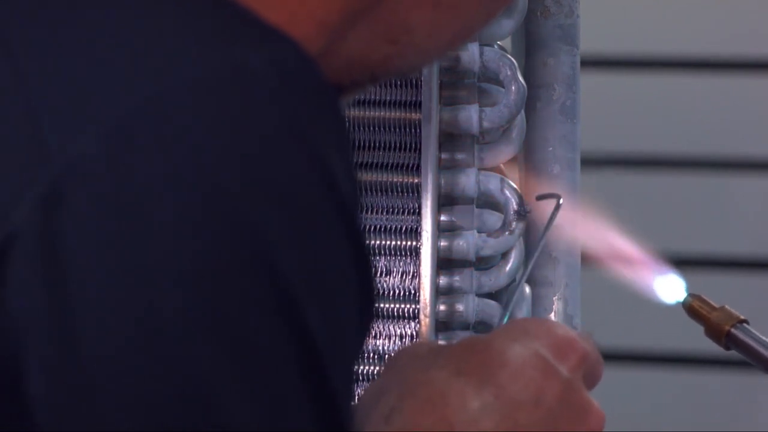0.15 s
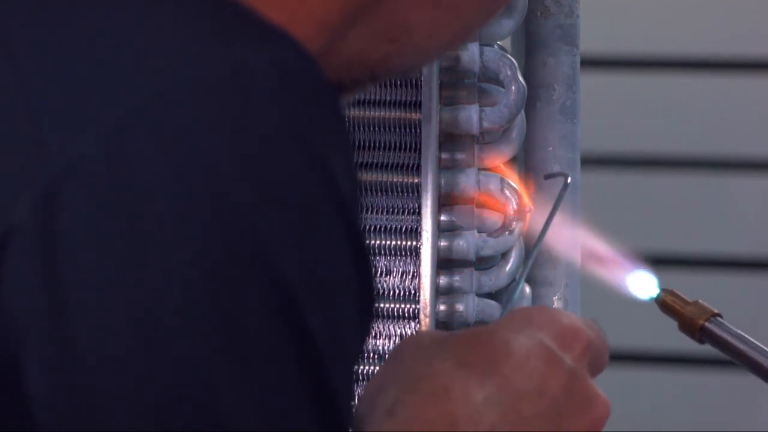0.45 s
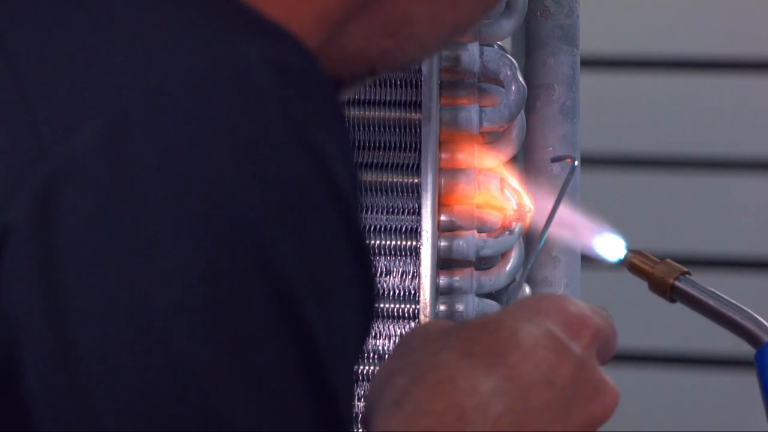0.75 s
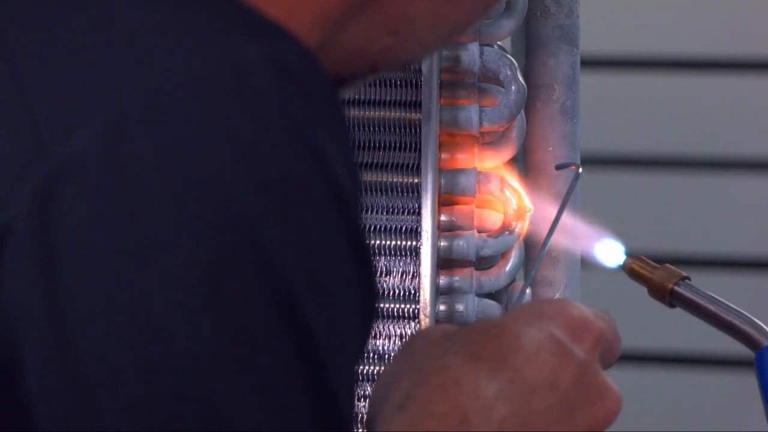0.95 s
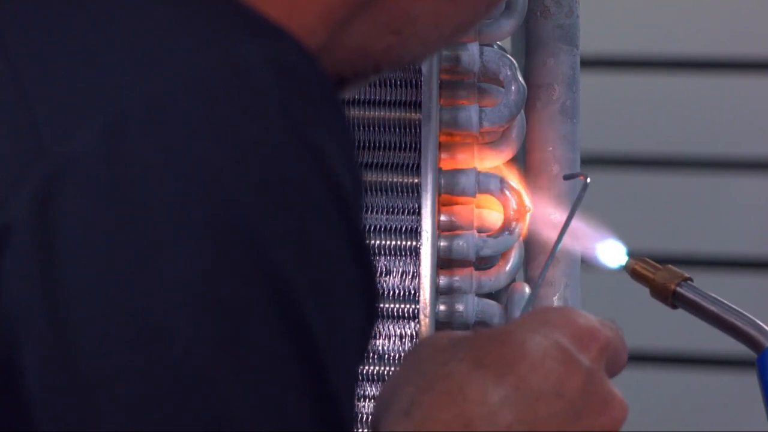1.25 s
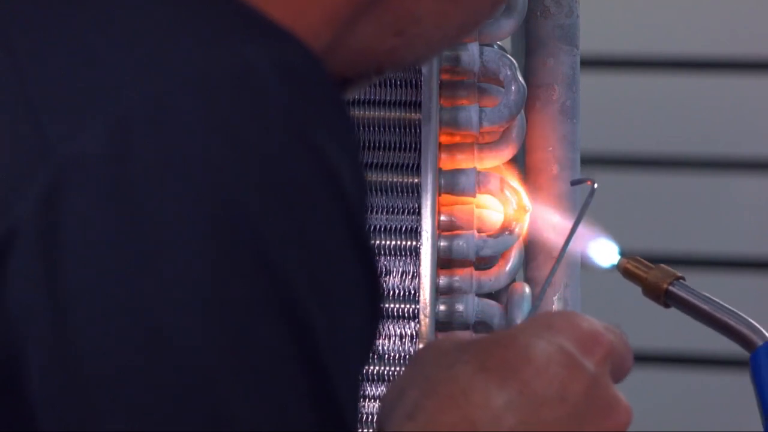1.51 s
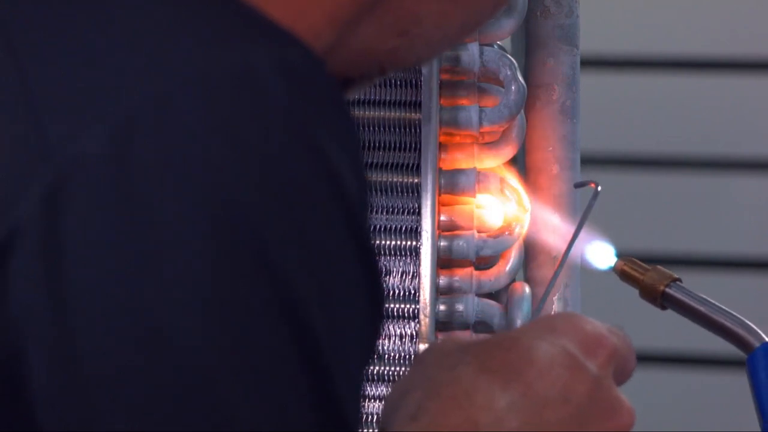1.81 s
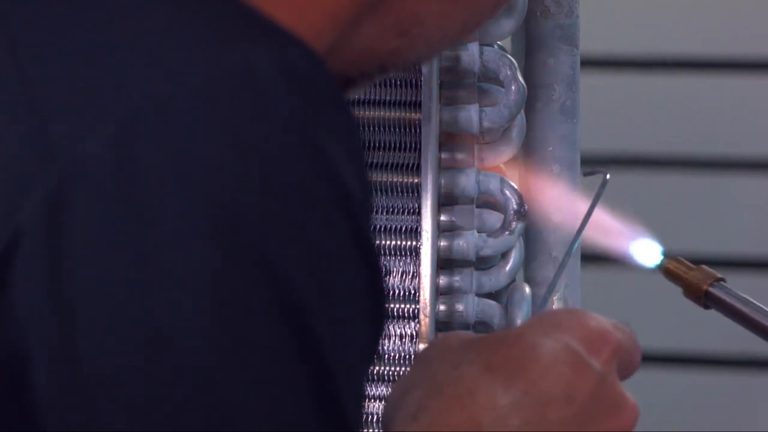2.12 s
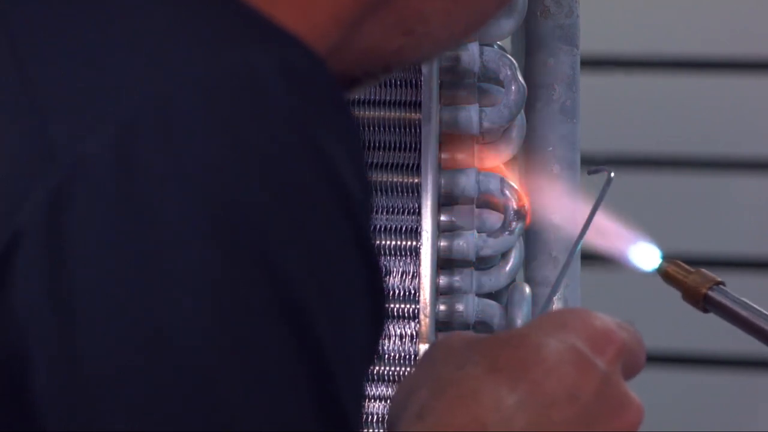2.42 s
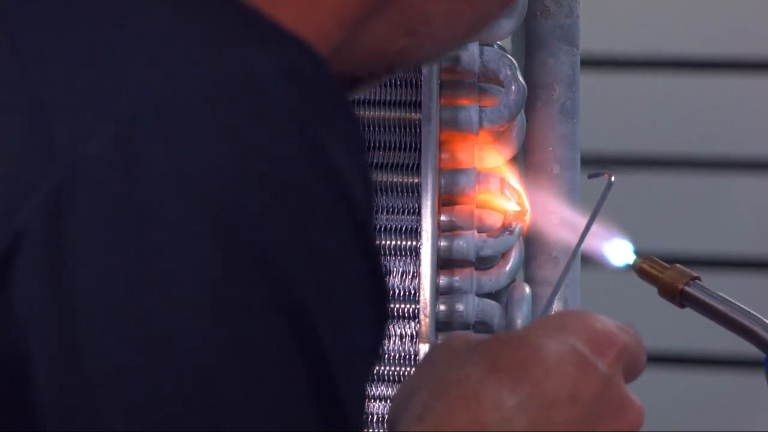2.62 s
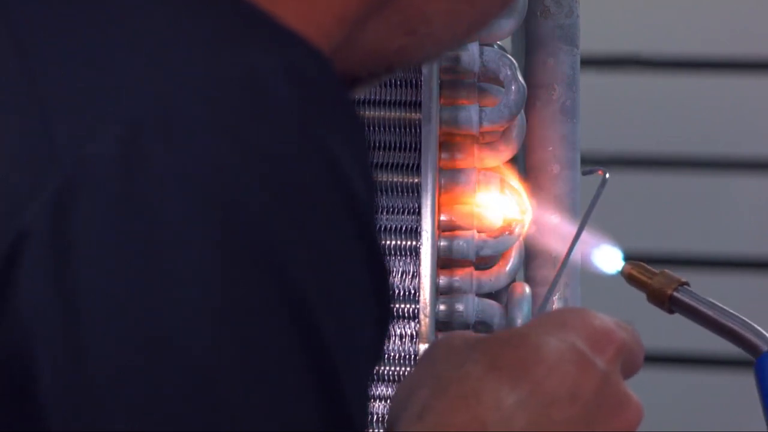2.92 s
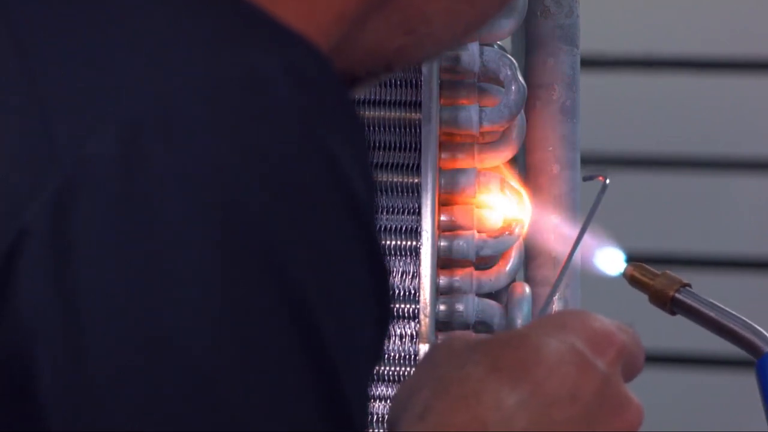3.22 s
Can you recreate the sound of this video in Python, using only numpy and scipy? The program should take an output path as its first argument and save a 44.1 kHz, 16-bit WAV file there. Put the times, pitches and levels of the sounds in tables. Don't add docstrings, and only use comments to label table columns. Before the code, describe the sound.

Gas torch burning close by: a piercing thin whistle over steady hiss and soft flame roar.

```python
import sys
import numpy as np
from scipy import signal
from scipy.fft import rfft, irfft, next_fast_len
from scipy.io import wavfile
from scipy.ndimage import uniform_filter1d, map_coordinates

SR = 44100
rng = np.random.default_rng(int(sys.argv[2]) if len(sys.argv) > 2 else 0)


def ratio_of_db(decibels):
    return 10 ** (np.asarray(decibels, float) / 20)


def persist_wave(psi):
    counts = np.round(np.clip(psi, -1, 1) * 32767).astype(np.int16)
    wavfile.write(sys.argv[1], SR, np.atleast_2d(counts).T)


N = 147735
WIDE = next_fast_len(N)


def level(x, db):
    return x * ratio_of_db(db) / np.sqrt(np.mean(x ** 2))


def read(table, col):
    rows = np.array(table, float)
    return np.interp(np.arange(N) / SR, rows[:, 0], rows[:, col])


def walk(rate):
    hold = int(SR / rate)
    steps = np.repeat(rng.standard_normal(N // 20), hold)[:N + hold]
    return 1.3 * uniform_filter1d(uniform_filter1d(steps, hold), hold)[:N]


def bandpass(x, low_hz, high_hz):
    return signal.sosfilt(signal.butter(2, [low_hz, high_hz], "band", fs=SR, output="sos"), x)


def bumps(x, table):
    hz = np.fft.rfftfreq(WIDE, 1 / SR)
    db = sum(change / (1 + (2 * (hz - f) / width) ** 2) for f, width, change in table)
    return irfft(rfft(x, WIDE) * ratio_of_db(db), WIDE)[:N]


# [t/s, length/s, depth/dB (negative for a surge)]
FALTERS = [(0.082, 0.043, -3.0), (0.219, 0.037, -1.8), (0.272, 0.014, -3.7), (0.318, 0.016, -4.2),
           (0.377, 0.012, 12.2), (0.474, 0.023, -3.1), (0.655, 0.013, 6.3), (0.686, 0.025, 4.7),
           (0.796, 0.011, 5.8), (0.813, 0.012, -3.8), (0.855, 0.009, 4.9), (0.885, 0.016, 6.5),
           (0.925, 0.012, -4.8), (0.958, 0.012, -2.8), (1.016, 0.015, -3.6), (1.051, 0.05, 6.6),
           (1.089, 0.009, -4.4), (1.107, 0.008, 6.1), (1.137, 0.019, 7.1), (1.325, 0.033, -2.7),
           (1.371, 0.06, 3.5), (1.429, 0.019, -4.1), (1.469, 0.02, 6.6), (1.525, 0.045, 2.5),
           (1.56, 0.015, -4.4), (1.585, 0.017, 3.5), (1.642, 0.008, -4.9), (1.703, 0.011, -4.1),
           (1.747, 0.044, 4.3), (1.8, 0.014, 3.7), (1.878, 0.06, -1.7), (1.943, 0.014, -2.9),
           (1.976, 0.014, -2.7), (2.014, 0.032, -1.7), (2.161, 0.012, 3.2), (2.223, 0.009, 5.8),
           (2.236, 0.017, -4.6), (2.266, 0.036, 7), (2.312, 0.036, 4), (2.35, 0.026, -3),
           (2.387, 0.036, 17), (2.457, 0.01, 3), (2.492, 0.04, -2.0), (2.592, 0.019, -2.9),
           (2.62, 0.011, 11), (2.634, 0.014, -3.9), (2.671, 0.008, -4.1), (2.725, 0.043, -2.7),
           (2.761, 0.047, 2.9), (2.841, 0.019, 14), (2.915, 0.03, -3.5), (2.941, 0.011, 12),
           (2.965, 0.03, 4.5), (3.001, 0.06, -2.5), (3.052, 0.008, -4.2), (3.107, 0.047, -1.5),
           (3.16, 0.021, -2.0), (3.237, 0.018, -3.0), (3.299, 0.009, -3.4), (3.334, 0.022, 15.2)]
FLUTTER_DB, FLUTTER_RATE = .4, 70
DEEPEN, SURGE, BREAK_DB = 1.1, .8, 8


def strength():
    t = np.arange(N) / SR
    firm_db = FLUTTER_DB * walk(FLUTTER_RATE)
    for at, length, db in FALTERS:
        depth = db * (DEEPEN if db > 0 else SURGE)
        sharpness = 4 if db > BREAK_DB else 2
        firm_db = firm_db - depth * np.exp(-(2 * (t - at) / length) ** sharpness)
    return firm_db


def spin(hz):
    return np.exp(2j * np.pi * np.cumsum(hz) / SR)


# [t/s, f/Hz, level/dB]
WHISTLE = [(0, 5014, -17.5), (.34, 5016, -16), (.375, 4996, -16), (.40, 5027, -16), (.62, 5016, -15.2),
           (.74, 5005, -14.8), (.81, 5032, -15), (1.0, 5034, -15.2), (1.25, 5045, -16), (1.37, 5030, -16),
           (1.52, 5046, -16.5), (1.76, 5042, -17), (1.88, 5031, -14.8), (2.23, 5030, -14.5),
           (2.46, 5019, -16), (2.6, 5031, -15.5), (2.85, 5032, -16), (3.35, 5031, -14.6)]
WAVER_HZ, WAVER_RATE = 6, 60
BREATH_DB, BREATH_WIDTH_HZ = -32.5, 80
SAG_HZ_PER_DB = 1.6


def whistle(strength_db):
    hz = read(WHISTLE, col=1) + SAG_HZ_PER_DB * np.clip(strength_db, -16, 0)
    memory = np.exp(-np.pi * BREATH_WIDTH_HZ / SR)
    soft = signal.lfilter([1], [1, -memory], rng.standard_normal((2, N)))
    breath = ((soft[0] + 1j * soft[1]) * spin(hz + 45)).real
    breath = level(breath, BREATH_DB) * ratio_of_db(strength_db / 2)
    tone = np.sqrt(2) * spin(hz + WAVER_HZ * walk(WAVER_RATE)).real
    return ratio_of_db(read(WHISTLE, col=2) + strength_db - 1.75) * tone + breath


# [t/s, gas flow level/dB, torch moved from its mean place/cm,
# flame bite on the metal level/dB, tip turned to the microphone level/dB]
HAND = [(0, 2, 3.1, 0.3, -1.5), (.3, 0, 2.3, 0.1, 1), (.55, 1.3, 2.5, 1.3, 0.5), (.75, 0.5, 1.5, 0.2, 0.8),
        (1.05, 0, 1.3, -0.3, 2), (1.35, 1.1, 0.9, 1.7, 3.5), (1.6, 1.5, 0.1, -0.2, 0),
        (1.76, 0.5, 1.1, -2.5, -.5), (1.9, -2, 0.73, -2, 3.5), (2.15, -0.7, 1.7, -1.2, 3.5),
        (2.32, 0.1, 0.95, -2, 3.5), (2.4, 1, 2.1, -0.4, -1), (2.55, 1.5, 2.3, 0.7, 1.5),
        (2.7, 1, 1.1, 0.3, 0.5), (2.9, 0.1, 0.94, -0.2, 1), (3.1, -0.6, 0.98, -1.2, 1),
        (3.25, 0.3, 1, -1.2, 1.5), (3.35, -2.3, 0.5, -2.7, 2.5)]
# [f/Hz, change/dB per dB]
COUPLING = [(300, 0.28), (1500, 0.11), (2500, 0.17), (3000, -0.44), (3500, -0.98), (4200, 0.7), (6000, 0.4),
            (8000, 0.15), (11000, 0.5)]
# [f/Hz, width/Hz, level/dB]
TIP = [(531, 28, 2.5), (945, 28, 5), (1344, 327, -15), (2370, 77, -1.5), (2600, 31, 3), (3520, 190, 9),
       (3827, 114, 11.5), (6274, 280, 7), (6494, 78, 8), (7230, 40, 8), (8040, 150, 9.5), (8930, 210, 7),
       (9700, 490, 3.5), (10300, 180, -6)]
TURN_HZ = 7750


def turbulence(points, strength_db, fall_db, swell_db, flicker_db):
    octave = np.log2(np.maximum(np.fft.rfftfreq(WIDE, 1 / SR), 1))
    points, coupling = np.array(points, float), np.array(COUPLING, float)
    edge = np.log2(points[:, 0])
    outside = np.maximum(edge[0] - octave, 0) + np.maximum(octave - edge[-1], 0)
    db = np.interp(octave, edge, points[:, 1]) - fall_db * outside
    colour = rfft(rng.standard_normal(WIDE)) * ratio_of_db(db)
    swell, turned_db = walk(14), read(HAND, col=4)
    out = 0
    for mid in np.arange(7.5, 14.1, 1 / 3):
        share = np.cos(np.clip(3 * (octave - mid), -1, 1) * np.pi / 2) ** 2
        lean_db = np.interp(mid, np.log2(coupling[:, 0]), coupling[:, 1]) * strength_db
        beam_db = turned_db / (1 + (TURN_HZ / 2 ** mid) ** 4)
        moving_db = swell_db * swell + flicker_db * walk(5.66) + lean_db + beam_db
        out = out + irfft(colour * share, WIDE)[:N] * ratio_of_db(moving_db)
    return level(bumps(out, TIP), 0)


# [f/Hz, level/dB per Hz]
JET = [(1710, -78), (2900, -35.5), (4790, -2), (4880, -4.5), (5170, -5), (5570, -8), (7620, -16.5),
       (9860, -19.5), (13000, -37.5)]
JET_DB = -19.5


def jet(strength_db):
    return ratio_of_db(JET_DB + read(HAND, col=1)) * turbulence(JET, strength_db, 30, 0.35, 1.0)


# [f/Hz, level/dB per Hz]
ROAR = [(190, -19), (330, -8.5), (531, -3), (957, -6), (1020, -3.5), (1350, 17.5), (1500, -1), (2650, -4.5),
        (3200, -5.5), (4160, -54), (7040, -120)]
ROAR_DB = -29.5


def roar(strength_db):
    return ratio_of_db(ROAR_DB + read(HAND, col=3)) * turbulence(ROAR, strength_db, 40, 0.17, 0.19)


# [f/Hz, width/Hz, level/dB]
HOLLOW = [(12500, 1500, -15), (14800, 1500, -3)]
AIR_DB = -34.5


def fizz(strength_db):
    treble = signal.butter(2, 10000, "high", fs=SR, output="sos")
    air = signal.sosfilt(treble, rng.standard_normal(N))
    moving_db = read(HAND, col=4) + .1 * strength_db + 0.76 * walk(6)
    return level(bumps(air, HOLLOW), AIR_DB) * ratio_of_db(moving_db)


# [t/s, peak level/dB]
POPS = [(0.087, -36), (0.264, -32), (.295, -30), (0.326, -42), (0.389, -31), (.417, -33), (.668, -34),
        (0.721, -32), (1.176, -32), (1.45, -38), (1.485, -31), (1.609, -31), (1.642, -39), (1.705, -35),
        (2.30, -31), (2.413, -30), (2.485, -41), (2.61, -49), (3.343, -32)]
POP_MS, RUMBLE_DB = 1.4, -49


def puffs(strength_db):
    t = np.arange(N) / SR
    slow = signal.butter(2, 500, fs=SR, output="sos")
    burn = signal.sosfilt(slow, rng.standard_normal(N)) ** 2
    low = bandpass(level(burn - burn.mean(), -2.2) + level(walk(900), -6.5), 10, 340)
    pops = sum(ratio_of_db(db) * np.exp(-(2000 * (t - at) / POP_MS) ** 2) for at, db in POPS)
    pops = pops - uniform_filter1d(pops, size=1500)
    return level(low, RUMBLE_DB) * ratio_of_db(0.29 * strength_db) + pops


# [f/Hz, width/Hz, level/dB]
DRAWN_BACK = [(3850, 600, -5.5), (4800, 300, 2), (5200, 200, -1.5), (5450, 250, 4), (5800, 200, -2),
              (6180, 300, 5), (6650, 300, -4.5), (7060, 200, 1.5), (7350, 450, -5.5), (7850, 300, 3),
              (8400, 200, -4), (9000, 300, -4), (10400, 500, 1), (11500, 600, -2), (12700, 1400, 7),
              (14200, 800, 1), (15300, 700, -4)]
# [delay/ms, signed share, path change/cm per cm moved]
MIRRORS = [(.62, -0.27, 0.42), (1.2, 0.22, -0.44), (1.5, 0.12, 0.2), (2.1, 0.057, 0.7), (3.3, 0.052, -2.8),
           (4.5, 0.1, -0.9), (7.28, 0.068, -2), (10.4, 0.12, -0.8), (13.0, 0.13, 0)]
BACK_CM = 2.2


def mirrored(x):
    moved_cm = uniform_filter1d(read(HAND, col=2), size=3000)
    back = np.clip(moved_cm / BACK_CM, -.3, 1.2)
    x = x + back * (bumps(x, DRAWN_BACK) - x)
    out = x
    for ms, share, per_cm in MIRRORS:
        delay_s = ms / 1000 + per_cm * moved_cm / 34300
        out = out + share * map_coordinates(x, [np.arange(N) - delay_s * SR], order=1, mode="mirror")
    return out


ROOM_T60_S, ROOM_DB = 0.56, -9.5


def room(x):
    t = np.arange(12000) / SR
    tail = rng.standard_normal(len(t)) * ratio_of_db(-60 * t / ROOM_T60_S) * (t > .008)
    tail = tail / np.sqrt(np.sum(tail ** 2))
    return signal.fftconvolve(np.r_[x[:6000][::-1], x], tail)[6000:N + 6000]


LEFT_DB, PORT_LAG_US = 1.0, 15
WIDE_DB, LOW_WIDE_DB = -39, -71


def scene():
    firm_db = strength()
    noise_db = np.maximum(firm_db, -9)
    noise = mirrored(jet(noise_db) + roar(noise_db) + fizz(noise_db))
    mid = whistle(firm_db) + noise + ratio_of_db(ROOM_DB) * room(noise) + puffs(firm_db)
    lagged = map_coordinates(mid, [np.arange(N) - PORT_LAG_US * SR / 1e6], mode="mirror")
    whistle_band = signal.butter(1, [4400, 5900], "band", fs=SR, output="sos")
    side = (ratio_of_db(LEFT_DB) - 1) / 2 * signal.sosfiltfilt(whistle_band, lagged)
    side = side + ratio_of_db(WIDE_DB) * room(noise)
    side = side + level(bandpass(rng.standard_normal(N), 330, 560), LOW_WIDE_DB)
    return np.array([mid + side, mid - side])


def roll_off(x):
    return signal.sosfilt(signal.butter(12, 15745, fs=SR, output="sos"), x)


BEND, SOFT = .04, .6


def record(dry):
    beats = bandpass(dry ** 2 - np.mean(dry ** 2), 20, 1500)
    bent = np.tanh(SOFT * dry) / SOFT + BEND * beats
    return roll_off(bent)


dry = scene()
out = record(dry)
persist_wave(out)
```